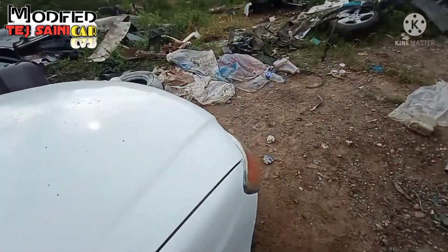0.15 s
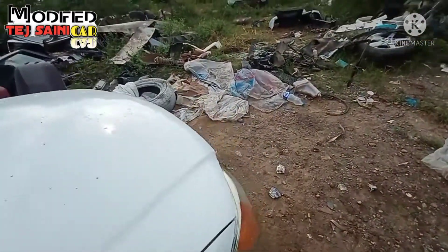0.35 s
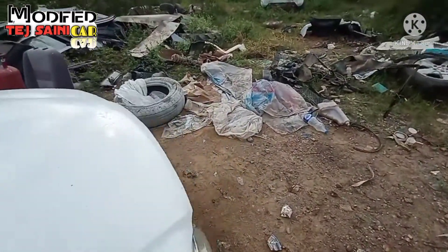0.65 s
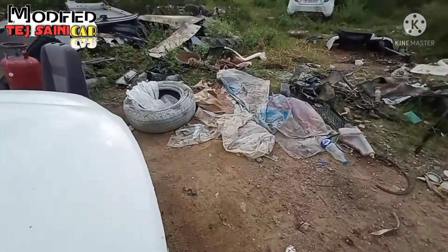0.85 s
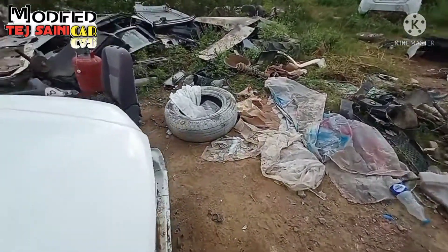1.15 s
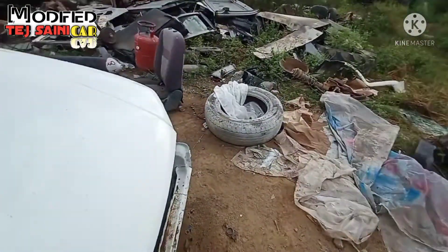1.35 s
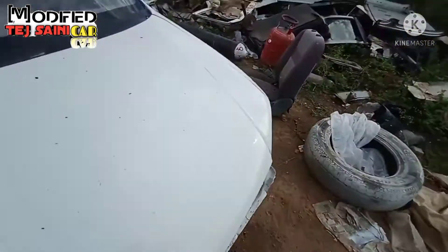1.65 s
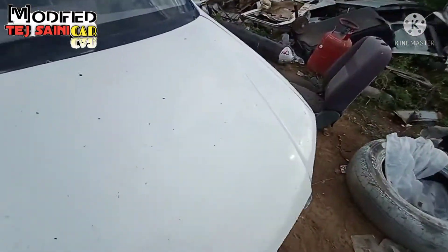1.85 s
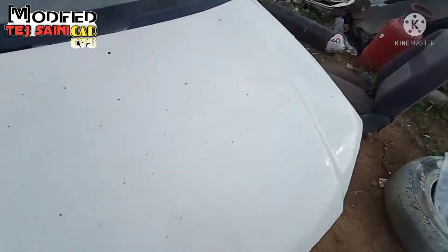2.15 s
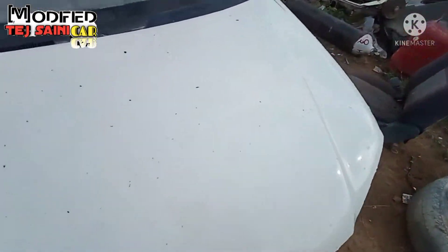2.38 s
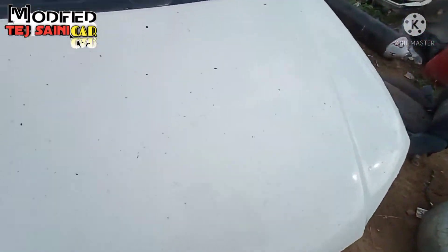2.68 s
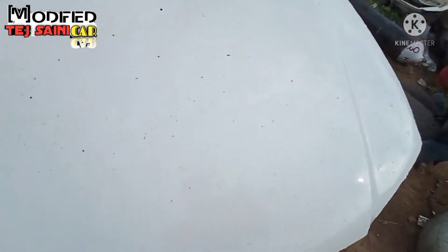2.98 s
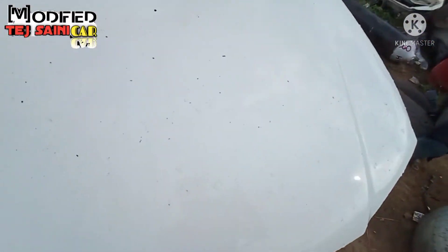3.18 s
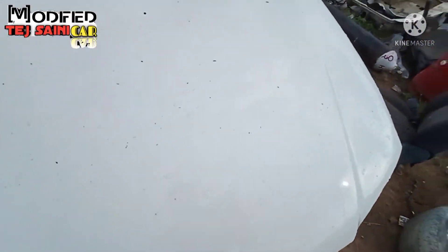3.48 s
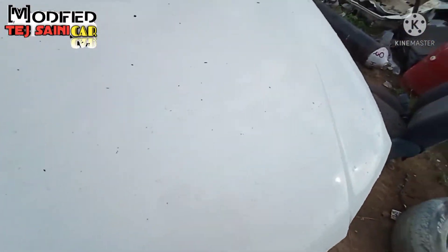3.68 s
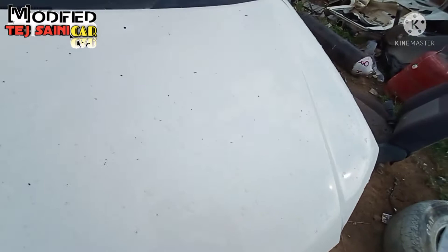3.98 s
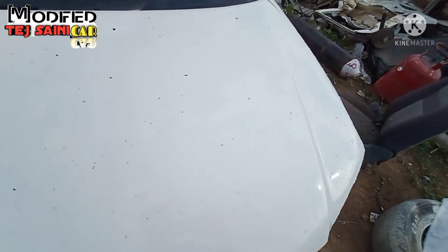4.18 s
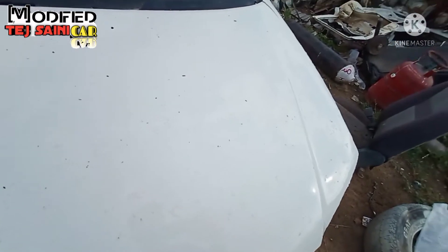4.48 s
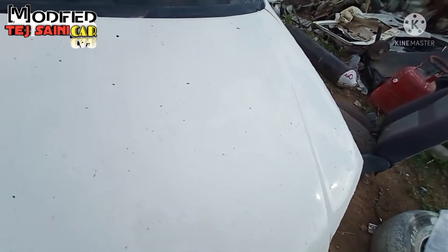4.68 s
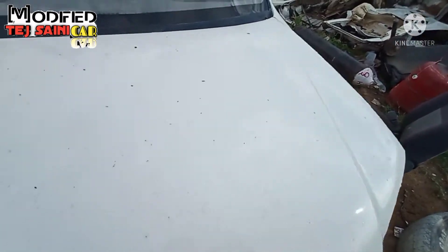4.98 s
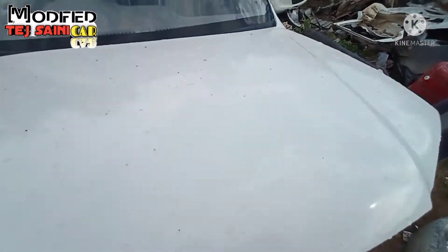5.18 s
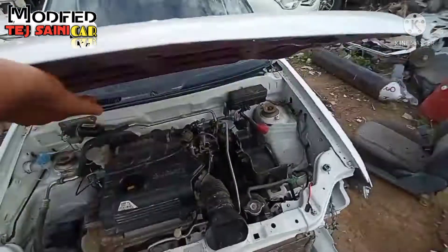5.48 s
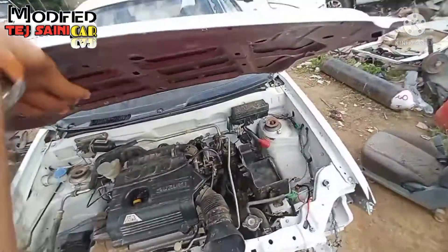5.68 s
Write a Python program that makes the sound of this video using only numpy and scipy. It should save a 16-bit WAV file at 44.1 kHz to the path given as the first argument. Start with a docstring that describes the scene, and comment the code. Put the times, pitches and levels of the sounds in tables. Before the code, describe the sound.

In a quiet open dirt yard, a few thin bird whistles and a faint insect tone, then footsteps scuff and sleeves rustle. At about two seconds a car bonnet is yanked in a tight cluster of loud, boomy metal clunks with a brief hinge squeak. After a lull with faint ticks it pops free with a ringing bang, then rustles and clanks as it rises. Close handheld phone pickup in stereo.

```python
"""A steel car bonnet is worked by hand in a dirt yard, heard at the two ports of a phone.
First birds whistle as gliding near sines beside a faint steady insect tone; shoes scuff and sleeves rustle
as grainy noise. Then the bonnet is pulled against its latch and knocked: decaying modes over dense noise.
A hinge squeaks as a gliding tone; the panel comes free, rings at new levels and sags in pitch as it is lifted.
Throughout, filtered noise makes a wavering far rumble, a high hiss of insects and a soft patchy hiss."""
import sys
import numpy as np
from scipy import signal
from scipy.fft import rfft, irfft
from scipy.io import wavfile
from scipy.ndimage import uniform_filter1d

SR = 44100
rng = np.random.default_rng(int(sys.argv[2]) if len(sys.argv) > 2 else 0)


def master_out(mix):
    """Clip the mix to full scale and print it as 16-bit PCM to the path in sys.argv[1]."""
    frames = np.transpose(np.atleast_2d(mix))
    ceiling = np.clip(frames, -1, 1)
    pcm = np.round(ceiling * 32767).astype(np.int16)
    wavfile.write(sys.argv[1], SR, pcm)


N = 257103

# air: bands of the noise
INSECT_HZ, INSECT_WIDTH_HZ, RUMBLE_HZ, RUMBLE_WIDTH_HZ = 7538, 895, 77.4, 19
HISS_LO_HZ, HISS_HI_HZ, MURMUR_DB, FAINT_TOP_DB = 478, 4470, -5, -83.5
# birds and insect tone: excess of left over right, depth of the fast waver in level
TONES_LEFT_DB, TONES_BREATH = 2.5, 0.3
# squeak: the octave level is relative to the fundamental
SQUEAK_S, SQUEAK_LENGTH_S, SQUEAK_HZ, SQUEAK_SAG_HZ = 2.57, 0.3, 1620, 160
SQUEAK_DB, SQUEAK_OCTAVE_DB = -52, -9
# bonnet: the weaker rings (lowest level, spreading up to 8 dB above it, and middle decay before its spread),
# depths of uneven decay and flutter
FAINT_RINGS_DB, FAINT_RINGS_T60_S = -39, 0.41
UNEVEN_DB, FLUTTER_DB = 4.5, 3.5
# how far the colour moves from clang to crack at 3.2 kHz, and on beyond crack at 15 kHz
SHOULDER_SHARE, DULL_SHARE = 0.41, 0.24
# the panel comes free, then its low rings lose this fraction of their pitch each second
RELEASE_S, SAG_PER_S, SAG_BELOW_HZ = 3.83, 0.02505, 600
# a blow with little clang is a slow push; the softest adds SOFT_PUSH_MS / 1.5
HARD_PUSH_MS, SOFT_PUSH_MS, SOFT_BELOW_DB, SOFT_SPAN_DB = 0.48, 23, -9.5, 0.5
# the panel's long dense ringing, weaker above the top
LONG_RING_DB, LONG_RING_T60_S, LONG_RING_TOP_HZ = -30.5, 0.9, 4500
LEFT_LAG_MS = 0.15
BASS_CUT_HZ, TOP_HZ = 49, 15550


def undb(db):
    """Level is logarithmic: 20 dB is a tenfold amplitude."""
    return 10 ** (np.asarray(db) / 20)


def unit(x):
    """Root-mean-square amplitude sets signal power: scale it to 1."""
    return x / np.sqrt(np.mean(x ** 2))


def band(x, lo_hz, hi_hz, order=2):
    """Band-pass filtering along the last axis selects a region of the spectrum, scaled to rms 1."""
    sos = signal.butter(order, [lo_hz, hi_hz], "band", fs=SR, output="sos")
    return unit(signal.sosfilt(sos, x))


def walk(rate):
    """Slow random fluctuation: levels held 1 / rate seconds, smoothed twice, rms 1."""
    hold = int(SR / rate)
    steps = np.repeat(rng.standard_normal(N // hold + 1), hold)
    smooth = uniform_filter1d(uniform_filter1d(steps, hold), hold)
    return unit(smooth[:N])


def curve(rows):
    """Linear interpolation in time through (time_s, value) rows."""
    return np.interp(np.arange(N) / SR, *np.transpose(rows))


def pair(noise, alike):
    """Interchannel correlation: mix one shared and one opposed noise into two channels."""
    alike = np.clip(alike, 0, 1)
    shared = np.sqrt((1 + alike) / 2) * noise[0]
    opposed = np.sqrt((1 - alike) / 2) * noise[1]
    return shared + opposed * np.array([[1], [-1]])


def air():
    """Band-limited noise with fluctuating level: far rumble, insects and a patchy hiss."""
    # level of the low rumble: time_s, level_db
    rumble_rows = [(0, -35.5), (.07, -67), (.15, -46.5), (.32, -51), (.55, -61.5), (.79, -47), (.83, -67),
                   (2.05, -63), (2.5, -52.5), (5.2, -60), (5.83, -50.5)]
    # level of the insects: time_s, level_db
    insect_rows = [(0, -70.5), (.6, -69.5), (.85, -79), (1.3, -67.5), (2.6, -58), (3.5, -59.5),
                   (4.1, -53.5), (5.83, -55.5)]
    # level of the soft hiss: time_s, level_db
    hiss_rows = [(0, -66), (.79, -69.5), (.84, -79), (1.3, -66.5), (2.05, -67.5), (2.5, -60), (2.9, -72.5),
                 (3.8, -69), (4.0, -42.5), (4.55, -54.5), (5.83, -47.5)]
    noise = rng.standard_normal((3, 2, N))

    rumble = band(noise[0], RUMBLE_HZ - RUMBLE_WIDTH_HZ / 2, RUMBLE_HZ + RUMBLE_WIDTH_HZ / 2, order=1)
    rumble = pair(band(rumble, 25, 140), 0.93)
    insects = band(noise[1], INSECT_HZ - INSECT_WIDTH_HZ / 2, INSECT_HZ + INSECT_WIDTH_HZ / 2, order=3)
    insects = pair(insects, 0.36)

    hiss = undb(MURMUR_DB + 2.2 * walk(13)) * band(noise[2], 200, HISS_LO_HZ)
    edges_hz = np.geomspace(HISS_LO_HZ, HISS_HI_HZ, 17)
    for lo_hz, hi_hz in zip(edges_hz, edges_hz[1:]):
        # each narrow band wavers by itself
        hiss = hiss + undb(-9 + 5 * walk(12)) * band(noise[2], lo_hz, hi_hz)

    out = undb(curve(rumble_rows) + 0.72 * walk(9.4)) * rumble
    out = out + undb(curve(insect_rows) + 2.8 * walk(35)) * insects
    out = out + undb(curve(hiss_rows)) * pair(hiss, 0.029)
    return out + undb(FAINT_TOP_DB) * band(noise[2], 8500, 20000)


def birds_and_insect_tone():
    """Frequency modulation: wavering near sines, gliding or steady, smeared by a dying noise tail."""
    # whistled notes of birds, and a faint steady insect tone near 3050 Hz:
    # start_s, length_s, first_hz, last_hz, level_db
    notes = [(0, 0.68, 3050, 3057, -69), (0, 0.05, 880, 870, -65.5), (0.104, 0.09, 2115, 1640, -63.5),
             (0.121, 0.13, 3860, 3180, -64.5), (0.222, 0.052, 3890, 4370, -56.5),
             (0.258, 0.045, 2720, 3220, -58.5), (0.308, 0.17, 1530, 1672, -69),
             (0.387, 0.1, 2360, 2770, -65), (1.473, 0.069, 2030, 1616, -59.5),
             (1.499, 0.1, 3920, 2506, -56), (1.53, 0.035, 4330, 3560, -51), (1.616, 0.073, 2570, 2317, -64),
             (1.713, 0.17, 3050, 3064, -78), (1.727, 0.125, 4630, 4890, -78),
             (4.335, 0.13, 4050, 3210, -51.5)]
    t, out, waver = np.arange(N) / SR, np.zeros(N), walk(120)
    for start, length, first_hz, last_hz, db in notes:
        fade = np.clip(np.minimum(t - start, start + length - t) / 0.0088, 0, 1)
        glide_hz = np.interp(t, [start, start + length], [first_hz, last_hz])
        phase = 2 * np.pi * np.cumsum(glide_hz * (1 + 0.005 * waver)) / SR
        tone = np.sin(phase) + undb(-22) * np.sin(2 * phase)  # a faint octave
        out += np.sqrt(2) * fade * undb(db + 0.99 * waver[::-1]) * tone
    out *= 1 + TONES_BREATH * walk(500)

    tail_s = np.arange(SR // 5) / SR
    tail = rng.standard_normal((2, SR // 5)) * np.exp(-np.log(1000) * tail_s / 0.28)  # t60 0.28 s
    smear = signal.fftconvolve(out[None], tail, axes=1)[:, :N]
    sides = undb(TONES_LEFT_DB / 2 * np.array([[1], [-1]]))
    return sides * (out + undb(-24.5) * smear)


def scuffs():
    """Friction noise: grains of uneven size in four bands, swelling and dying with each rub."""
    # scuffs and brushes: start_s, rise_s, fade_s, level_db, brightness (row of the colours, held at 3)
    rubs = [(0.608, 0.06, 0.12, -40.5, 2.3), (0.97, 0.094, 0.24, -40, 2.84), (1.196, 0.014, 0.12, -40, 0.9),
            (1.222, 0.0017, 0.065, -33, 0.84), (1.225, 0.03, 0.16, -44, 1.25),
            (1.311, 0.037, 0.13, -49, 0.043), (1.712, 0.016, 0.07, -53, 0.14),
            (1.873, 0.028, 0.11, -37.5, .2), (2.5, 0.073, 0.16, -53, 1.9), (4.23, 0.13, 0.18, -33.5, 2.9),
            (5.32, 0.022, 0.16, -43, 0.98), (5.418, 0.18, 0.55, -34, 3.37)]
    # rows are shoe on dirt, scrape, rustle, cloth: near_400hz_db, near_1500hz_db, near_4khz_db, near_12khz_db
    colours = [(-6.5, -5.5, -49, -51), (-23.5, -0.5, -7, -6), (-18.5, -16.5, 0, -17), (-31, -24.5, -17, -9)]
    # low_hz, high_hz, likeness of the two ports
    regions = [(209, 870, 0.88), (1010, 2450, 0.23), (3060, 6170, 0.033), (7500, 22000, 0.044)]
    t, out = np.arange(N) / SR, 0
    for (lo_hz, hi_hz, alike), colour_db in zip(regions, np.transpose(colours)):
        grain = undb(2.2 * rng.exponential(size=N // 32 + 1).repeat(32)[:N])
        swell = 0
        for start, rise, fade, db, bright in rubs:
            age = t - start - rise  # time since the peak
            rising = np.clip(1 + age / rise, 0, 1) ** 2
            dying = np.exp(-np.log(1000) * (np.abs(age) / fade) ** 1.54)
            peak = undb(db + np.interp(bright, range(len(colours)), colour_db))
            swell = swell + peak * np.where(age < 0, rising, dying)
        noise = band(grain * rng.standard_normal((2, N)), lo_hz, hi_hz, order=3)
        out = out + swell * pair(noise, alike)
    return out


def squeak():
    """Frictional oscillation of the hinge as the bonnet settles: its pitch sags and recovers."""
    share = np.clip((np.arange(N) / SR - SQUEAK_S) / SQUEAK_LENGTH_S, 0, 1)
    bow = np.sin(np.pi * share)
    phase = 2 * np.pi * np.cumsum(SQUEAK_HZ - SQUEAK_SAG_HZ * bow + 22 * walk(220)) / SR
    swell = np.minimum(3 * bow, 1) * (1.3 - share) * undb(SQUEAK_DB + 3 * walk(90))
    # the octave comes up briefly in the later part
    octave = undb(SQUEAK_OCTAVE_DB) * np.sin(np.pi * share ** 2) ** 8 * np.sin(2 * phase)
    return np.sqrt(2) * swell * (np.sin(phase) + octave)


def blow(rings, colour_db, damping, push, strength, size=32768):
    """Modal excitation: a contact drives clear rings, dense modes and the panel's long dense ringing."""
    # points of the colour: pitch_hz for clang, boom, reference, crack, top, shoulder
    colour_hz = np.array([1500, 100, 350, 5000, 15000, 3200])
    # modes too dense to tell apart: pitch_hz, level_db, t60_s (before damping), rise_s
    sheet_modes = [(40, -30, 0.2, 0.014), (95.2, -14, 0.72, 0.04), (240, -9.5, 0.52, 0.0037),
                   (640, -16.5, 0.19, 0.011), (2050, -10.5, 0.15, 0.0039), (4440, -6.5, 0.1, 0.0012),
                   (8670, -13, 0.1, 0.00035), (15960, -27.5, 0.12, 0.0014)]
    # left minus right: pitch_hz, difference_db
    left_more = [(100, -1.06), (1000, 0.5), (2000, 1), (4000, 4.5), (8000, -2.5)]
    t, hz = np.arange(size) / SR, np.fft.rfftfreq(size, 1 / SR)
    order = np.argsort(colour_hz)

    def tint(f):
        """Spectral colour in dB, interpolated over log frequency."""
        return np.interp(np.log(f), np.log(colour_hz[order]), np.array(colour_db)[order])

    def uneven(depth_db, step):
        """Random amplitude modulation with a new level every step samples."""
        return undb(depth_db * np.interp(t, t[::step], rng.standard_normal(size // step)))

    # the level flutters at random, together across neighbouring modes
    flutter = uneven(FLUTTER_DB, 256) * uneven(FLUTTER_DB / 2, 1024)
    out = np.zeros((2, size))
    chances = rng.standard_normal((len(rings), 4))
    for (f, db, t60), (luck, detune, split, turn) in zip(rings, chances):
        # each spot struck drives the modes differently, and a close twin beats against each
        gain = undb(db + tint(f) + 3.0 * luck) * np.exp(-np.log(1000) * damping * t / t60)
        beat_hz = (6 + 0.00511 * f) * (1 + 0.24 * split)
        beat = 1 + 0.43 * np.sin(2 * np.pi * beat_hz * t + np.pi * turn)
        tone = np.sin(2 * np.pi * f * (1 + 0.004 * detune) * t)
        out += gain * beat * uneven(UNEVEN_DB / 2, 2048) * tone

    noise = strength * rfft(rng.standard_normal((2, size)))
    rows = np.transpose(sheet_modes)
    for f in 40 * 2 ** np.arange(0, 8.7, 1 / 3):  # third octaves
        db, t60, rise = (np.interp(np.log(f), np.log(rows[0]), column) for column in rows[1:])
        shape = np.clip(1 - 3 * np.abs(np.log2((hz + 1) / f)), 0, 1)
        fine = unit(irfft(noise * np.sqrt(shape), size))
        onset = 1 - np.exp(-t / max(rise, 1e-4))
        ring = np.exp(-np.log(1000) * damping * t / t60)
        long_gain = undb(LONG_RING_DB) / (1 + (f / LONG_RING_TOP_HZ) ** 4)
        long_ring = long_gain * np.exp(-np.log(1000) * t / LONG_RING_T60_S)
        # the long ringing dies unevenly, less so in the bass
        long_ring = long_ring * uneven(UNEVEN_DB * min(f / 900, 1), 512)
        shaken = flutter ** min(f / 400, 1)
        # the ports hear the bass alike and the treble less so
        ports = pair(fine, 1 - 0.82 * min(f / 900, 1) ** 2)
        out += undb(db + tint(f)) * onset * (ring + long_ring) * shaken * ports

    out *= (1 - np.exp(-t / push)) ** 2  # a soft contact builds up slowly
    side_hz, more_db = np.transpose(left_more)
    side_db = np.interp(np.log(hz + 1), np.log(side_hz), more_db)
    lag = np.exp(-2j * np.pi * hz * LEFT_LAG_MS / 1000)
    out[0] = irfft(rfft(out[0]) * undb(side_db) * lag, size)
    return out


def bonnet():
    """Modal vibration of one plate under every blow: releasing the latch alters its mode levels."""
    # blows on the steel: start_s, strength_db, then boom_db, clang_db, crack_db above the strength,
    # damping by latch and hand (a factor on the decay rate, at least 0.3)
    blows = [(2.095, -35, 4, -20, -21, 0.39), (2.137, -18.5, -1, -10, -20, 0.54),
             (2.173, -10, -5, -9, -6.5, 1.37), (2.196, -7, -3.5, 1, -22.5, 1.07),
             (2.409, -6, -18.5, -6.5, -26.5, 1.55), (2.425, -11, 3, 0, -9.5, 1.56),
             (2.549, -21, -40, -56, -37, 0.84), (3.297, -30, -24, -22, -24, 2.23),
             (3.418, -27, -19.5, 3.5, -35, 1.37), (3.447, -30.5, -21.5, -4.5, -38, 1.25),
             (3.801, -29.5, -1, -25, -35.5, 2), (3.845, -19.5, 4, -3.5, -12, 1.08),
             (3.885, -4, -15, -3.5, -10.5, 0.91), (4.198, -12, -36, -17.5, -26, 1.23),
             (4.245, -25.5, -20, -8, -27, 0.86), (4.603, -12.5, -2, -12.5, -23, 0.74),
             (4.629, -8, -9, 2, -5.5, 1.17), (4.932, -10, -24.5, 4, 2, 1.217)]
    # clear rings of the panel: pitch_hz, latched_db, free_db, t60_s (before damping)
    panel_rings = [(90.9, -4, -11.5, 0.43), (170, -12, -10.5, 0.67), (241, -19, -15.5, 0.55),
                   (331.8, -14.5, -10, 0.65), (342, -21, -19.5, 1.34), (353.2, -25, -30.5, 1.4),
                   (459, -15.5, -13.5, 0.3), (516, -31.5, -21, 1.14), (866, -16, -14.5, 0.12),
                   (1013, -48, -34.5, 1.39), (1356, -18, -16, .2), (1390, -16.5, -31, 0.33),
                   (1485, -12, -6, 0.14), (1593, -29, -27, .9), (1746, -24, -38, 0.31),
                   (1970, -37.5, -34, 1.4), (2495, -35, -25.5, 0.9), (2920, -31, -21, 0.67),
                   (3295, -27, -21, 1), (4183, -34, -27, 0.37), (4340, -26.5, -16, 0.31),
                   (4860, -34, -19.5, 0.38)]
    out = np.zeros((2, N + SR))
    sheet = rng.exponential(size=4097)  # the dense modes are unevenly strong
    # many weaker rings at chance pitches
    place, size, life = rng.random((3, 36))
    faint_db = FAINT_RINGS_DB + 8 * size
    faint_rings = zip(600 * 10 ** place, faint_db, faint_db, FAINT_RINGS_T60_S * (0.5 + life))
    rings = list(panel_rings) + list(faint_rings)

    for s, db, boom_db, clang_db, crack_db, damping in blows:
        spot = rng.exponential(size=4097)  # where the blow lands
        strength = undb(np.minimum(2.4 * sheet + 3.4 * spot, 18).repeat(4)[:16385])
        # the low rings go flat as the free panel is lifted
        flat = 1 - SAG_PER_S * max(s - RELEASE_S, 0)
        struck = []
        for f, latched_db, free_db, t60 in rings:
            pitch_hz = f * (flat if f < SAG_BELOW_HZ else 1)
            struck.append((pitch_hz, free_db if s > RELEASE_S else latched_db, t60))
        push_ms = HARD_PUSH_MS + SOFT_PUSH_MS / (1.5 + np.exp((clang_db - SOFT_BELOW_DB) / SOFT_SPAN_DB))
        step_db = crack_db - clang_db
        top_db, shoulder_db = crack_db + DULL_SHARE * step_db, clang_db + SHOULDER_SHARE * step_db
        colour_db = db + np.array([clang_db, boom_db, 0, crack_db, top_db, shoulder_db])
        sound = blow(struck, colour_db, max(damping, 0.3), push_ms / 1000, strength)
        first = int(s * SR)
        out[:, first:first + sound.shape[1]] += sound
    return out[:, :N]


def scene():
    """Linear superposition: all sources add at the two ports."""
    return air() + birds_and_insect_tone() + scuffs() + squeak() + bonnet()


def record(dry):
    """Band limits and saturation: the ports lose deep bass, the loudest peaks clip, the top is cut."""
    bass_cut = signal.butter(2, BASS_CUT_HZ, "high", fs=SR, output="sos")
    top_cut = signal.ellip(10, 0.2, 70, TOP_HZ, fs=SR, output="sos")
    thin = signal.sosfilt(bass_cut, dry)
    return signal.sosfilt(top_cut, np.clip(thin, -1, 1))


dry = scene()
out = record(dry)
master_out(out)
```